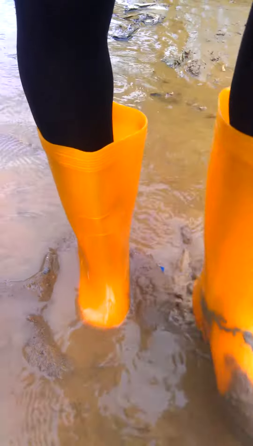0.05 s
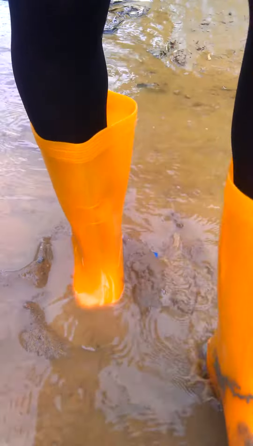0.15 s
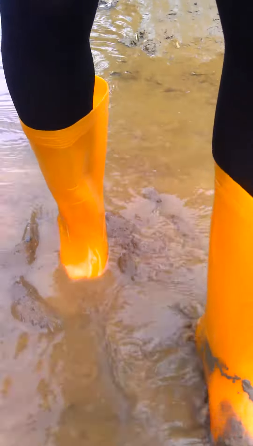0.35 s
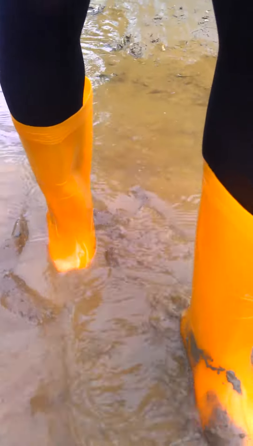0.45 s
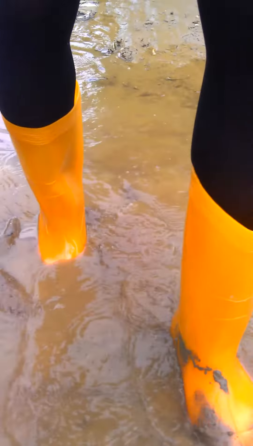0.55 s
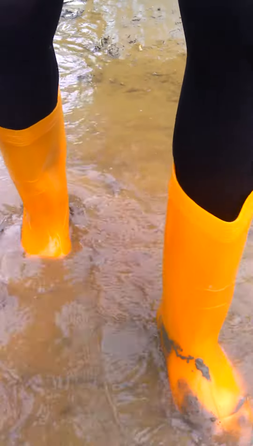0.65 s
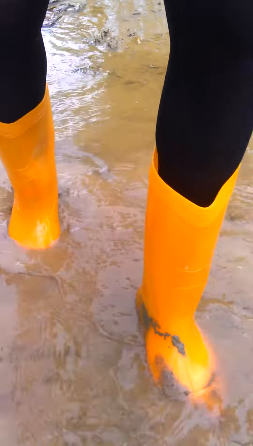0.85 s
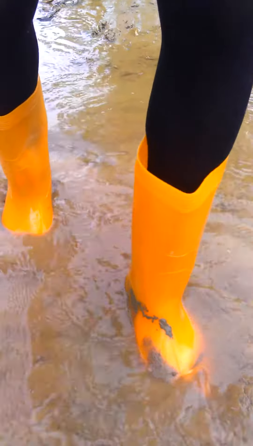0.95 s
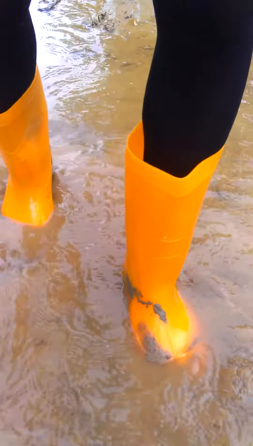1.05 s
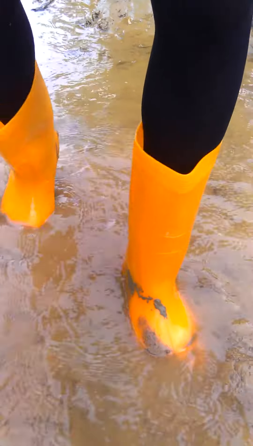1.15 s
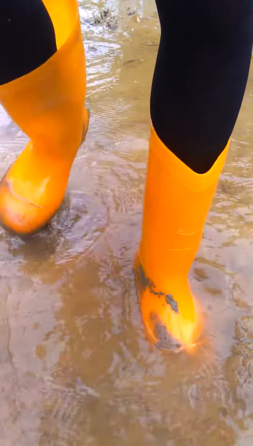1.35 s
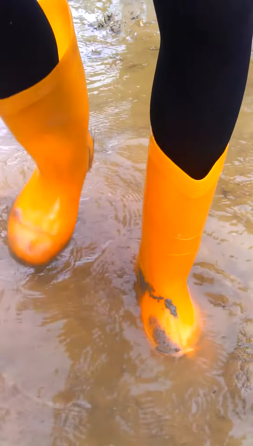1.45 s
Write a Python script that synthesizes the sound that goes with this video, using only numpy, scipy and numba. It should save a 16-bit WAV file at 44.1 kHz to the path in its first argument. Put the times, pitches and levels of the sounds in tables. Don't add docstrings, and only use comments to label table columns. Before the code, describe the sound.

A rubber boot slaps into shallow muddy water, close and dry. Faint wet ticks lead up from 0.15 seconds, then a sharp, bright squelch bursts at about 0.25, lasting only some 0.04 seconds. Small bubbles and droplets pop until 0.42. Distant raspy bird chirps come near 0.8 and 0.97 over faint, slightly fading outdoor hum; tiny drips tick around 1.45.

```python
import sys
import numpy as np
from scipy import signal
from scipy.fft import rfft, irfft, next_fast_len
from scipy.io import wavfile
from scipy.ndimage import uniform_filter1d
from numba import njit

SR = 44100
rng = np.random.default_rng(int(sys.argv[2]) if len(sys.argv) > 2 else 0)


def put_to_file(sound):
    columns = np.atleast_2d(sound).T
    safe = np.clip(columns, -1, 1)
    whole_steps = np.round(safe * 32767)
    wavfile.write(sys.argv[1], SR, whole_steps.astype(np.int16))


def boost(x):
    u = np.asarray(x, float) / 20
    return 10 ** u


N = 66150
T = np.arange(N) / SR
BUBBLE_RISE = .004
BUBBLE_ATTACK = .25


def unit(x):
    return x / np.sqrt(np.mean(x ** 2))


def noise_band(centre_hz, width_hz):
    low_hz = max(centre_hz - width_hz / 2, 20)
    high_hz = min(low_hz + width_hz, .45 * SR)
    sos = signal.butter(2, [low_hz, high_hz], "band", fs=SR, output="sos")
    return unit(signal.sosfilt(sos, rng.standard_normal(N)))


def walk(rate_hz):
    hold = int(SR / rate_hz)
    steps = np.repeat(rng.standard_normal(N // hold + 1), hold)
    return 1.3 * uniform_filter1d(uniform_filter1d(steps, hold), hold)[:N]


@njit
def rings(rows, n, sr, rise, attack):
    out = np.zeros(n)
    for s, hz, size, cycles, phase in rows:
        tau = cycles / hz / 2
        start = s if attack > 0 else s - tau
        first = max(int(start * sr) + 1, 0)
        for i in range(first, min(n, first + int(6 * tau * sr))):
            u = (i / sr - start) / tau
            phase += 2 * np.pi * hz * (1 + rise * u) / sr
            if attack > 0:
                shape = 2 * (1 - np.exp(-u / attack)) * np.exp(-u)
            else:
                shape = (u * np.exp(1 - u)) ** 2
            out[i] += size * shape * np.sin(phase)
    return out


def ring(time_s, pitch_hz, peak_db, cycles, rise, attack=BUBBLE_ATTACK):
    phase = 2 * np.pi * rng.random(len(time_s))
    rows = np.stack([time_s, pitch_hz, boost(peak_db), cycles, phase], 1)
    return rings(rows, N, 1. * SR, 1. * rise, 1. * attack)


def outdoors():
    # pitch_hz, level_db (per Hz)
    spectrum = [(80, 4.5), (600, -3), (1250, -0.5), (1900, -5.5), (2500, -14.5), (4500, -14.8), (6300, -12),
                (10500, -13)]
    level_db, flicker_db = -49.5, .35
    fade_db, fade_hz = 4, 2200
    hz_at, db_at = np.array(spectrum).T
    size = next_fast_len(N)
    f = np.maximum(np.arange(size // 2 + 1) * SR / size, 1)
    noise = rfft(rng.standard_normal(size)) * boost(np.interp(np.log(f), np.log(hz_at), db_at))
    fade = np.clip(1 - T / 1.45, 0, 1)
    out = np.zeros(N)
    for octave in np.arange(4, 15, .5):
        share = np.cos(np.pi * np.clip(np.log2(f) - octave, -.5, .5)) ** 2
        low_share = 1 / (1 + (2 ** octave / fade_hz) ** 2)
        db = flicker_db * walk(14.7) + fade_db * fade * low_share
        out += boost(db) * irfft(noise * share, size)[:N]
    return boost(level_db) * out / np.std(out[-N // 4:])


def chorus():
    return boost(-68.5 + 1.2 * walk(12)) * noise_band(3130, 640)


def pockets():
    # start_s, pitch_hz, peak_db, ring_cycles
    pocket_rows = [(.0005, 1140, -44, 10.424), (.089, 460, -47, 4.3), (0.1744, 3030, -41, 14),
                   (.178, 2950, -43, 8.3), (0.1879, 3270, -36.5, 9), (.191, 3330, -42, 11),
                   (0.205, 3100, -46, 6), (0.2259, 2033, -39.5, 9.5), (0.244, 1940, -18, 2.9),
                   (0.2438, 3560, -26, 3), (.2452, 2500, -25, 3), (0.2465, 3130, -19, 3.5),
                   (.246, 430, -42, 4), (.2555, 300, -41, 3), (.2665, 900, -36, 4),
                   (0.2485, 1800, -24, 3.1), (0.2503, 2250, -18.5, 3), (0.2524, 2450, -20.5, 4.2),
                   (.2528, 2220, -16, 6), (.2548, 2250, -22, 6.2), (0.2582, 2970, -30, 4.6),
                   (0.2567, 1766, -27.5, 7.63), (0.2599, 3340, -23, 2.5), (.2657, 2000, -20.5, 2.5),
                   (.2668, 1180, -34, 2), (0.2681, 1250, -26, 4.2), (.2691, 2200, -28, 6.7),
                   (.2714, 2200, -21.5, 2.614), (.2745, 990, -37.5, 3), (.287, 950, -46, 4.6),
                   (0.2993, 1040, -37, 3.3), (.3051, 520, -44, 4.3), (0.3158, 1200, -38, 4),
                   (0.3314, 1750, -41, 5), (0.3482, 1360, -37, 3), (.354, 3200, -48, 15),
                   (.381, 3250, -45.5, 14), (0.3698, 1294, -30.5, 13), (.3697, 2060, -38, 2.9),
                   (0.37, 3000, -40, 4.4), (0.3722, 3200, -39, 4.4), (0.387, 1310, -39, 5),
                   (0.402, 1900, -37, 3), (.402, 900, -43, 3.4), (0.4048, 1500, -41, 4),
                   (0.4054, 3400, -38, 5), (.417, 1510, -40, 5.1), (1.405, 2350, -51, 9),
                   (1.4448, 3066, -50.5, 7.12), (1.472, 2060, -47.5, 8.1)]
    tick_db, tick_ratio = -7, 1.66
    start_s, pitch_hz, peak_db, cycles = np.array(pocket_rows).T
    bubbles = ring(start_s, pitch_hz, peak_db, cycles, BUBBLE_RISE)
    ticks = ring(start_s, tick_ratio * pitch_hz, peak_db + tick_db, np.ones(len(start_s)), 0)
    return bubbles + ticks


def spray():
    # centre_s, pitch_hz, peak_db, ring_cycles
    film_rows = [(.2418, 8500, -34, 6), (.2441, 6000, -15, 1.5), (.2441, 9300, -20, 2),
                 (.2465, 9000, -28, 4), (.2509, 5800, -22, 4), (.2535, 8300, -22, 10),
                 (.2548, 9600, -17, 5), (.2552, 6500, -22, 5), (.2576, 6200, -9, 4.5),
                 (.2574, 9000, -15, 5), (.2614, 9800, -6.5, 7), (.2615, 6900, -18, 3.5),
                 (.264, 9500, -25, 6), (.2657, 9000, -24, 4), (.2661, 5000, -27, 3), (.268, 6200, -20, 5),
                 (.2691, 9800, -10, 6), (.269, 7100, -15.5, 4), (.2702, 9800, -16, 5),
                 (.2714, 8500, -18, 4), (.2743, 9600, -14, 4), (.2744, 6500, -20, 4), (.2767, 6000, -26, 5),
                 (.2786, 7200, -27, 6), (.281, 9700, -32, 8), (.2522, 9000, -26, 6), (.2538, 5900, -25, 5),
                 (.2766, 9000, -30, 5), (.2793, 8800, -31, 5), (.2745, 3600, -32, 3)]
    # centre_s, pitch_hz, peak_db, ring_cycles
    drop_rows = [(.014, 6316, -35.5, 3), (.082, 8830, -37.5, 9.4), (.128, 8500, -44.5, 4.1),
                 (0.1577, 8500, -32, 6), (.1575, 6500, -41, 4), (.162, 7300, -37, 3),
                 (0.1708, 8500, -36, 6), (.1748, 5200, -33.5, 2.7), (.1768, 7168, -31, 5),
                 (.1735, 7000, -37, 4), (.175, 8800, -36, 5), (.182, 7000, -38, 3), (.1845, 6300, -35, 4),
                 (0.1858, 8700, -28, 6), (0.1855, 6900, -32, 5), (0.1885, 7430, -26, 5.8),
                 (.1883, 8800, -29, 6), (.191, 8900, -34, 8), (.1932, 9000, -38, 8), (0.1938, 5500, -36, 3),
                 (.2045, 7500, -38, 5.5), (.217, 6800, -33.5, 6), (0.218, 9800, -39, 6),
                 (.2262, 7000, -39, 3.2), (.227, 9000, -37, 5), (.234, 6000, -43, 5),
                 (0.3465, 5836, -38, 13.3), (.348, 9550, -33, 9), (.354, 8200, -39.5, 5),
                 (.358, 4800, -47, 2.7), (.369, 6500, -36, 2.7), (0.375, 9500, -35, 8),
                 (.377, 6450, -34, 2.3), (0.3794, 6300, -33, 6), (.399, 8000, -38, 4.6),
                 (0.4097, 7000, -33.5, 2.734), (.4155, 9900, -37, 9.4), (1.445, 9140, -35, 3.4),
                 (1.484, 6500, -39.5, 3.8)]
    drops_db, edge_db, edge_ratio = -3.5, -10, .66
    centre_s, pitch_hz, peak_db, cycles = np.array(film_rows + drop_rows).T
    peak_db[len(film_rows):] += drops_db
    spindles = ring(centre_s, pitch_hz, peak_db, cycles, 0, 0)
    edges = ring(centre_s, edge_ratio * pitch_hz, peak_db + edge_db, np.full(len(centre_s), 1.2), 0, 0)
    return spindles + edges


def churn():
    # time_s, level_db
    stir_points = [(.15, -75), (.185, -52), (.205, -63.5), (.238, -52), (.246, -34), (.256, -29),
                   (.263, -33), (.27, -30.5), (.285, -45), (.31, -54), (.45, -62.5)]
    stir_s = .5
    fizz_per_s, fizz_cycles, scatter_db = 4000, 3.9, 1.5
    low_hz, high_hz, tilt_db_per_octave = 900, 10100, 7
    slosh_db, hiss_db = -21, -2
    start, pitch, luck = rng.random((3, int(fizz_per_s * stir_s)))
    octaves = pitch * np.log2(high_hz / low_hz)
    db = tilt_db_per_octave * octaves - scatter_db * np.log(luck + 1e-3)
    fizz = ring(start * stir_s, low_hz * 2 ** octaves, db, np.full(len(db), fizz_cycles), BUBBLE_RISE)
    fizz /= np.std(fizz[:SR // 2])
    slosh = boost(slosh_db) * noise_band(382, 490)
    hiss = boost(hiss_db) * noise_band(7500, 6500)
    stir = boost(np.interp(T, *np.array(stir_points).T)) * (T < stir_s)
    return stir * (fizz + slosh + hiss)


def bird():
    # start_s, length_s, from_hz, to_hz, level_db
    notes_sung = [(.49, .03, 3200, 3250, -67), (.7715, .011, 3060, 3160, -52),
                  (.785, .035, 3180, 3100, -50.5), (.812, .052, 3190, 3140, -56.5),
                  (.782, .035, 3480, 3520, -60), (.83, .03, 3300, 3520, -61), (.866, .034, 3050, 3170, -60),
                  (.9562, .013, 2880, 3200, -44), (.9655, .011, 3150, 3290, -47.5),
                  (.973, .026, 3210, 3260, -51.5), (.956, .018, 2820, 2850, -57),
                  (.973, .034, 2840, 2890, -54), (.974, .025, 3450, 3640, -56),
                  (.996, .015, 3480, 3400, -53), (1.007, .032, 3320, 3380, -56),
                  (1.05, .016, 3340, 3380, -60), (1.073, .026, 3380, 3380, -62),
                  (.865, .03, 3380, 3380, -64), (1.01, .05, 3020, 3120, -66)]
    bird_db, rasp_db = -.5, -16
    trill_hz, trill_depth, roughness = 130, .25, .15
    echo_db, echo_t60_s = -10, .18
    rasp = boost(rasp_db) * noise_band(3200, 800)
    out = np.zeros(N)
    for start_s, length_s, from_hz, to_hz, level_db in notes_sung:
        u = np.clip((T - start_s) / length_s, 0, 1)
        phase = 2 * np.pi * np.cumsum(from_hz + (to_hz - from_hz) * u ** .81) / SR
        trill = 1 - trill_depth * np.sin(2 * np.pi * trill_hz * (T - start_s)) + roughness * walk(300)
        envelope = np.clip(np.minimum(5 * u, 4 * (1 - u)), 0, 1)
        out += boost(level_db + bird_db) * envelope * (trill * np.sin(phase) + rasp)
    t = T[:SR // 2]
    echo = rng.standard_normal(len(t)) * np.exp(-np.log(1000) * t / echo_t60_s)
    return out + boost(echo_db) * signal.fftconvolve(out, echo / np.linalg.norm(echo))[:N]


def scene():
    return (outdoors() + chorus() + pockets() + spray() + churn() + bird())[None]


def top_cut(x):
    return signal.sosfilt(signal.butter(12, 11770, fs=SR, output="sos"), x)


def record(dry):
    top_hz, bottom_hz = 10520, 270
    low_pass = signal.firwin(1201, top_hz, window=("kaiser", 8), fs=SR)
    high_pass = signal.butter(3, bottom_hz, "high", fs=SR, output="sos")
    mix = signal.sosfilt(high_pass, signal.fftconvolve(dry, low_pass[None], "same"))
    return top_cut(mix)


dry = scene()
out = record(dry)
put_to_file(out)
```